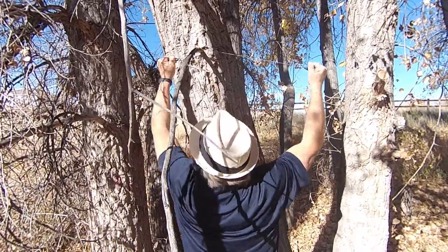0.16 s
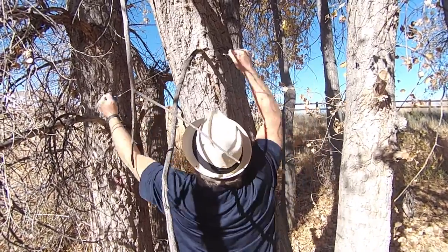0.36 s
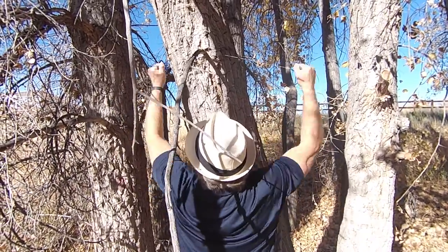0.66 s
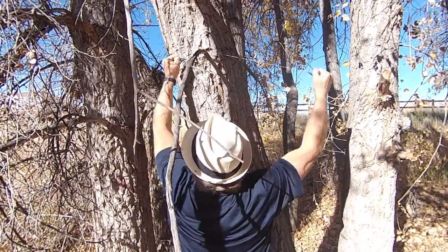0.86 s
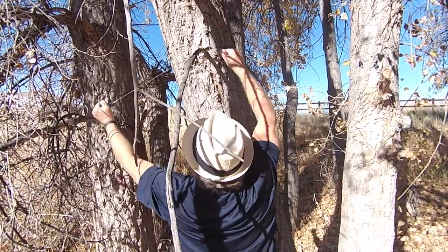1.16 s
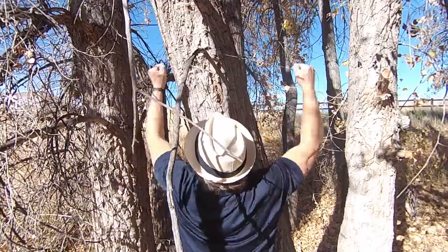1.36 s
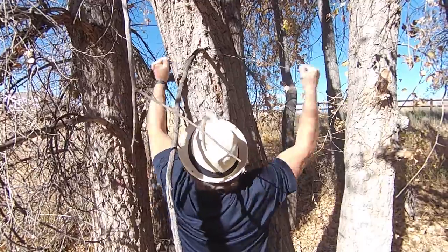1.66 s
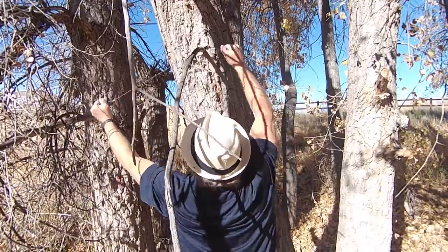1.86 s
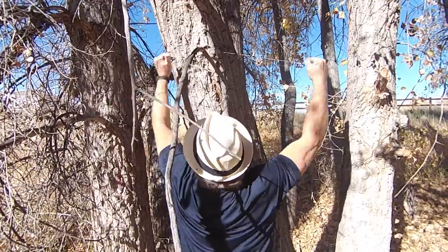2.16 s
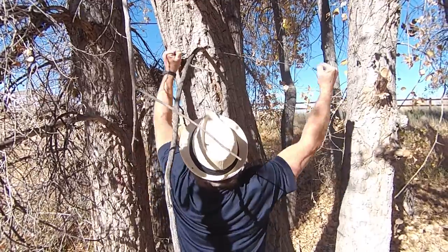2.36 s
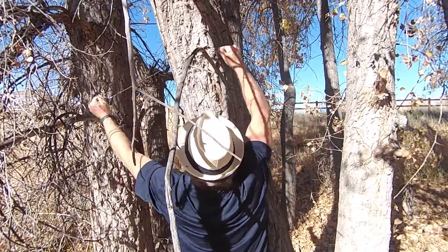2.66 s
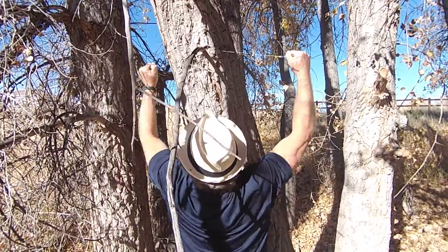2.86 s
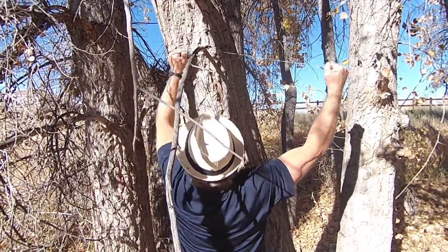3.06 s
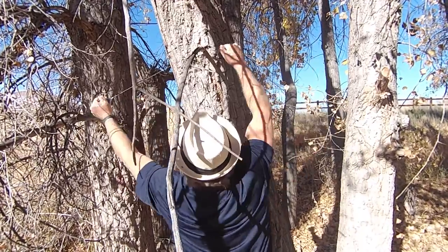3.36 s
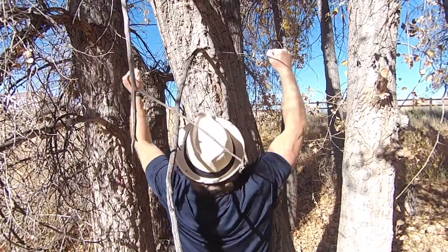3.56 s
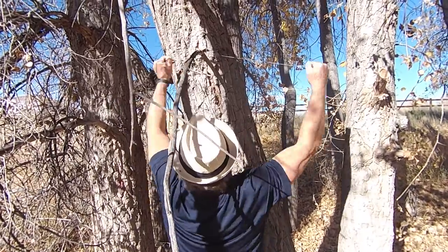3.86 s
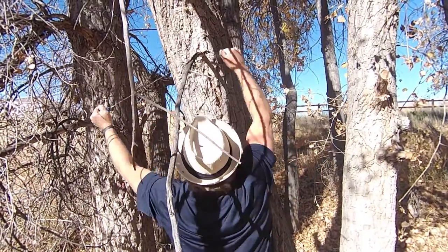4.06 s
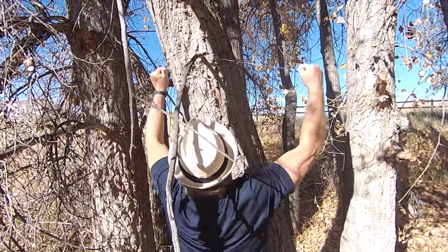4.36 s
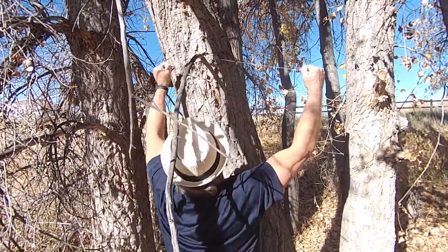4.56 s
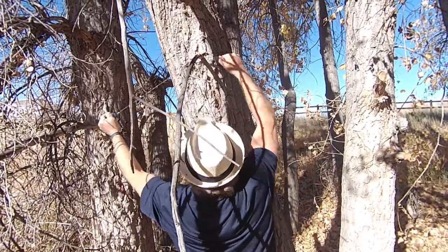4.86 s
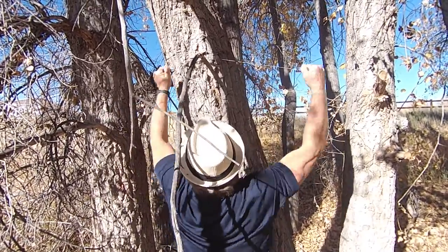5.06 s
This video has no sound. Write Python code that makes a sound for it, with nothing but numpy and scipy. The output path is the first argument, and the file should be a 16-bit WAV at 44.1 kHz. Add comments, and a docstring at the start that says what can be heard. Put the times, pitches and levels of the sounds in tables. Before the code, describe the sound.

A toothed cable saw is pulled by hand back and forth through a dry tree branch, about three strokes a second for the whole five seconds. The first pull only skims the bark, under a brief rustle of dry leaves. From about 0.1 seconds the teeth bite, and each stroke is a bright, gritty rasp that swells and falls away before the next. The teeth sing faintly through the rasp, and the cable and wood ring lightly, with brief high flares around 1.8, 3.5 and 4 seconds. Many pulls start with a tiny sharp catch. The strokes become slightly softer in the second half. Leaves rustle faintly again at about 4.7 seconds. Behind the sawing is a quiet outdoor hiss of air and distant leaves. Light wind puffs on the single microphone, with a few soft low thumps, clearest around 0.8 and 1.1 seconds.

```python
"""Cable saw in a dry branch

A toothed cable saw is pulled to and fro through a dry branch among trees. Its teeth tear the wood in
a stream of tiny blows that make the branch and cable ring, and their passing rate sings faintly through
the rasp. Leaves rustle at first and near the end; light wind puffs on the single microphone."""
import sys
import numpy as np
from scipy import signal
from scipy.fft import rfft, irfft, next_fast_len
from scipy.io import wavfile
from scipy.ndimage import uniform_filter1d, map_coordinates

SR = 44100
rng = np.random.default_rng(int(sys.argv[2]) if len(sys.argv) > 2 else 0)


def output_pcm(signal):
    """Save a mono or channel-first signal as 16-bit PCM at the path in sys.argv[1].

    Samples are clipped to [-1, 1] before scaling.
    """
    pcm = np.clip(np.atleast_2d(signal).T, -1, 1) * 32767
    wavfile.write(sys.argv[1], SR, np.round(pcm).astype(np.int16))


N = 229695

# Pulls of the saw; the first only skims the bark. Levels are relative. Each row has six groups:
# the start, bite, brightest, fastest, easing and end moments in seconds;
# rasp in dB at bite, brightest, fastest and easing; treble in dB at bite, brightest and easing;
# low scrape in dB at bite and mid-pull; tooth rate in Hz at brightest and fastest;
# tooth tone in dB at brightest and fastest.
SAW_PULLS = [
    [(-.2, -0.091, .05, 0.059, 0.094, 0.11), (-37, -39.5, -38, -42.5), (2, 2.5, 1), (0, 0), (2200, 2192),
     (-26, -28)],
    [(.06, .116, .19, .3, .352, .405), (-34.5, -34.5, -32, -33.5), (-10, -1, -7.5), (-7, -15.5),
     (2450, 3100), (-19, -1.7)],
    [(.415, .465, .54, .614, .692, .765), (-34.5, -32, -29.5, -33.5), (-17, -2, -7), (-5, -14.5),
     (2400, 2450), (-9, -11.5)],
    [(0.783, 0.831, .888, .98, 1.064, 1.13), (-37, -36, -31, -37), (-10, 0, -10.5), (-2.5, -21),
     (2300, 2900), (-13, -5.5)],
    [(1.12, 1.189, 1.288, 1.353, 1.42, 1.462), (-33.5, -31.5, -30, -35.5), (-13, -2, -7.5), (-8.5, -13.5),
     (2460, 2800), (-11, -21)],
    [(1.554, 1.575, 1.688, 1.776, 1.822, 1.868), (-34, -36, -31, -36), (-19, -2.8, -10), (-5, -18.5),
     (2480, 3100), (-25, -2)],
    [(1.88, 1.94, 2.1, 2.03, 2.182, 2.25), (-35.5, -33, -33, -36.5), (-19, -1.56, -7.5), (-10, -14.5),
     (2600, 2550), (-6.5, -8)],
    [(2.297, 2.343, 2.444, 2.535, 2.568, 2.625), (-36.5, -36, -33, -35.5), (-12, -3.5, -9.5), (-6.5, -19),
     (2550, 3200), (-11, -16)],
    [(2.633, 2.69, 2.84, 2.88, 2.938, 3.012), (-35.5, -33.7, -34, -36), (-22, -2.3, -10), (-6.5, -16),
     (2300, 2600), (-8, -19)],
    [(3.037, 3.082, 3.152, 3.29, 3.318, 3.372), (-34.5, -35.5, -34, -41.5), (-13, -1, -9), (-8, -16),
     (2000, 2750), (-23.5, -5)],
    [(3.363, 3.439, 3.54, 3.59, 3.67, 3.748), (-37.5, -36.5, -34.5, -41), (-10, 0, -5.5), (-4, -14.5),
     (2550, 2370), (-12, -11.5)],
    [(3.758, 3.79, 3.92, 3.965, 4.035, 4.11), (-36.5, -38.5, -36, -38), (-21, 0, -8), (-2.5, -10.5),
     (2470, 2720), (-10, -10.5)],
    [(4.111, 4.169, 4.31, 4.25, 4.362, 4.444), (-39, -34.5, -36, -37), (-7.5, -0.66, -5.5), (-1, -12),
     (2250, 2520), (-9, -8)],
    [(4.465, 4.516, 4.57, 4.67, 4.728, 4.8), (-40, -38, -35.5, -40.5), (-10, 0, -9.5), (-3.5, -15),
     (2150, 2440), (-13, -9.5)],
    [(4.795, 4.865, 4.92, 5.01, 5.092, 5.138), (-38, -36.5, -32.7, -39.5), (-6.5, -4, -6), (-1.8, -16.5),
     (2050, 2280), (-14, -9.5)],
    [(5.148, 5.179, 5.2, 5.24, 5.398, 5.45), (-48, -42.5, -37, -39), (-3, -6, -11), (-1, -11), (1900, 1730),
     (-5, -6)],
]
# Ringing notes of the branch and cable. Each row: pitch in Hz, width in Hz (widened if too narrow),
# then relative level in dB in the shallow, the middle and the deep cut.
RINGING_NOTES = [(543, 10, -20, -18.5, -15), (694, 14, -15, -15.5, -19), (796, 8.3, -12, -11.5, -13.5),
                 (953, 68, -10, -9, -17), (1035.4, 13, -9, -8, -9.5), (1207, 105, -10, -9.5, -9.5),
                 (1577, 11.7, -9.5, -4.5, -5), (1836, 20, -4.5, -10, 1), (2094, 127, -3.5, -4, -3),
                 (2106, 29, 0, -8, -27), (2405, 63, -5, -14.5, -9), (2596, 46, 4, 3.5, 7),
                 (2800, 160, -8, -5, -7), (3295, 13, 6, 7.5, 1), (3316, 92, 1, -3, -15),
                 (3910, 45, 10.5, 2, -10), (3933, 28, 9.5, 9, -5.5), (4160, 150, -25, -11, -12),
                 (4384, 33, -4, -3, -9.5), (4670, 180, -0.5, -2, 0.5), (4977, 51, -4.5, -5, -3),
                 (5302, 28, 4.5, -7.5, 2), (5323, 78, 1, -10, -3), (5974, 64, -1, -3.5, 0.5),
                 (6475, 55, -20, -2, -25.5), (6970, 18, -2.5, -9.5, -6.5), (7890, 44, -20, -26, -13),
                 (8690, 67, -2, -3, -4), (9900, 110, -26, -51, -33), (11470, 300, -11.5, -12, -9)]
# The cable skims bark, then settles into the wood. Each row: time in seconds, relative ringing in dB.
SEATING = [(0, -4), (.085, -17), (.11, -0.5)]
# Tone of tearing wood. Each row: frequency in Hz, relative level in dB.
RASP_SPECTRUM = [(240, -73), (400, -23), (751, -47), (903, -18), (1570, -9), (1720, -16.5), (2100, -7.5),
                 (2640, -5.5), (3710, -2.5), (4000, 2.5), (7510, -13), (9310, -5.5), (15700, -25.5)]
# Teeth catch as a pull starts. Each row: time in seconds, starting level in dB.
TOOTH_CATCHES = [(0.7764, -58), (0.8076, -39), (0.828, -36), (1.1812, -38), (1.5713, -35), (1.9006, -45),
                 (1.9315, -34), (2.3314, -39), (3.0584, -43), (3.0764, -40), (3.3922, -41), (3.7748, -42),
                 (4.146, -43)]
# The loudest flares of ringing. Each row: time in seconds, pitch in Hz, level in dB.
LOUD_FLARES = [(0.161, 2310, -40), (0.187, 4100, -44), (0.605, 3840, -43), (0.878, 2180, -40.5),
               (0.894, 3900, -39), (1.64, 2300, -41.5), (1.666, 3870, -46), (1.771, 3970, -34),
               (2.072, 6470, -42), (2.422, 6280, -46), (2.531, 3340, -40), (2.564, 2620, -42),
               (2.811, 2060, -44), (2.843, 3970, -43), (2.901, 2750, -47), (3.215, 2330, -42),
               (3.505, 4960, -37), (3.52, 2603, -36.5), (3.95, 4030, -37.5), (3.976, 2590, -44),
               (4.234, 4900, -41), (4.32, 2180, -42), (4.361, 2700, -39), (4.587, 4658, -43),
               (4.66, 2422, -39), (4.886, 6020, -46), (4.937, 4830, -42), (4.972, 6150, -42),
               (4.988, 2070, -40), (5.043, 2570, -39.5)]
# Dry leaves nearby. Each row: time of the peak in seconds, level in dB, seconds to fall by 15 dB.
LEAF_RUSTLES = [(.054, -43.5, 0.19), (.152, -53, 0.1), (4.712, -51, 0.2), (4.812, -64, .035)]
# Distant air and leaves. Each row: time in seconds, air level in dB, leaf hiss level in dB.
FAR_LEVELS = [(0.0, -54, -47), (0.42, -59, -66), (0.77, -61.5, -70), (1.15, -59, -70), (1.5, -61, -73),
              (1.85, -59.5, -73), (2.3, -60.5, -71), (2.62, -58.5, -71), (3.2, -57, -60), (3.75, -59, -63),
              (4.1, -58.5, -76), (4.46, -59.5, -74), (4.8, -59, -77), (5.21, -58, -74)]
# Tone of distant air, leaf hiss, leaf crackle and wind. Each row: frequency in Hz, relative level in dB.
AIR_SPECTRUM = [(120, -2), (200, -1), (600, 0), (2500, -2), (5000, -1), (6900, -6), (9500, -3),
                (12000, -11), (14000, -18), (15700, -20)]
HISS_SPECTRUM = [(5000, -30), (9000, 0), (12500, -3), (15700, -12)]
CRACKLE_SPECTRUM = [(150, -30), (350, -10), (800, 0), (4000, -3), (15000, -20)]
WIND_SPECTRUM = [(12, -30), (20, 0), (38, -1), (54, 3), (133, -11), (189, -17), (300, -40), (390, -45),
                 (660, -120)]
# Wind on the microphone. Each row: time in seconds, level in dB.
WIND_LEVELS = [(0.0, -69.5), (0.9, -65.5), (1.1, -65), (1.36, -69), (1.7, -68), (2.6, -65), (3.1, -69.5),
               (3.68, -63), (4.22, -68), (4.63, -67), (5.05, -66.5), (5.21, -75)]
# Soft thumps near the microphone. Each row: time in seconds, peak level in dB, pitch in Hz.
SOFT_THUMPS = [(0.072, -51, 79.4), (.553, -51, 510), (.791, -40.5, 73), (0.816, -40.5, 81),
               (0.838, -48, 89.5), (1.077, -43, 105.8), (2.44, -48, 87), (2.821, -50, 90),
               (3.085, -49, 89.7), (3.35, -54, 259.4), (4.755, -50, 70)]

CUT_STAGES_S = .8, 2.2, 4.2   # when the cut is shallow, middle and deep
MAX_Q = 110   # wood damps ringing: pitch divided by width is at most this
LOW_HZ, HIGH_HZ, TOP_HZ, CUTOFF_HZ = 1700, 7000, 11500, 15720
STILL_DB, SILENT_DB = -69, -85   # rasp at the ends of a pull, and between pulls
TREBLE_RISE_S, LOW_SETTLE_S = .034, .049   # counted from the bite
BITE_TOOTH_HZ, CATCH_DECAY_S, FLARE_SPREAD_S = 2005, .0035, .015


def saw():
    """Tiny tearing blows and the tooth tone make a broad rasp and set the branch and cable ringing."""
    rasp_db, treble_db, low_db, tooth_hz, tooth_db = pull_curves()
    blows = from_db(rasp_db + drift(33)) * grains(per_s=12000, spread_db=2.5)
    catches = tooth_catches()
    teeth = from_db(rasp_db + tooth_db) * tooth_tone(tooth_hz)
    wood = from_db(-5.5) * colour(blows, RASP_SPECTRUM) + from_db(-6.5) * teeth
    wood += cable_ringing(blows)
    wood += branch_ringing(blows + from_db(-5.5) * teeth)
    return pull_brightness(tension_sway(wood), treble_db, low_db) + catches


def pull_curves():
    """How the pulls move the rasp level, treble, low scrape, tooth rate and tooth level over time."""
    levels, treble, low, rate, teeth = [], [], [], [], []
    for moments, rasp_db, treble_db, low_db, tooth_hz, tooth_db in SAW_PULLS:
        start, bite, bright, fast, ease, end = moments
        # extra points about halfway up and down round off the edges
        rise = start + .51 * (bite - start)
        fall = ease + .48 * (end - ease)
        levels += in_time(sorted([
            (start - .004, SILENT_DB), (start, STILL_DB), (rise, rasp_db[0] - 12),
            *zip((bite, bright, fast, ease), rasp_db),
            (fall, rasp_db[-1] - 14.5), (end, STILL_DB), (end + .004, SILENT_DB)]))
        treble_in = min(bite + TREBLE_RISE_S, (bite + bright) / 2)
        treble += [*zip((bite, bright, ease), treble_db), (treble_in, treble_db[1] - 2.5), (fall, -9.5)]
        settled = min(bite + LOW_SETTLE_S, fast)
        low += [(bite, low_db[0]), (settled, low_db[1]), (fast, low_db[1]), (ease, -12)]
        rate += [(bite, BITE_TOOTH_HZ), *zip((bright, fast), tooth_hz), (ease, .9 * tooth_hz[1])]
        teeth += [(bite, -21), *zip((bright, fast), tooth_db), (ease, tooth_db[1] - 5)]
    return np.max(levels, axis=0), *(in_time(sorted(rows))[0] for rows in (treble, low, rate, teeth))


def tooth_tone(tooth_hz):
    """Teeth pass unevenly, so their tone is a narrow band of noise around their passing rate."""
    phase = 2 * np.pi * np.cumsum(tooth_hz) / SR
    uneven = keep_band(rng.standard_normal((2, N)), "low", hz=95, order=2)
    return rms_one(uneven[0] * np.sin(phase) + uneven[1] * np.cos(phase))


def tooth_catches():
    """Teeth catch as a pull starts, each time with a sharp burst of noise."""
    out, t = np.zeros(N), np.arange(1500) / SR
    fade = np.exp(-t / CATCH_DECAY_S)
    for s, level_db in TOOTH_CATCHES:
        at = round(s * SR)
        out[at:at + len(t)] += from_db(level_db) * rng.standard_normal(len(t)) * fade
    return colour(out, RASP_SPECTRUM)


def cable_ringing(blows):
    """The cable's many faint, high notes come and go as different links touch."""
    out = np.zeros(N)
    for hz in np.geomspace(7400, 14500, 14):
        level_db = -11 - 32 * np.log2(hz / 9000) ** 2 + 3.6 * drift(26)
        out += resonate(from_db(level_db) * blows, hz, width_hz=71)
    return out


def branch_ringing(push):
    """The branch and cable ring together; the mix of notes changes as the cut deepens."""
    out, t = np.zeros(N), np.arange(N) / SR
    seating_db, = in_time(SEATING)
    for k, (hz, width_hz, *stages_db) in enumerate(RINGING_NOTES):
        wander_db = 1.5 * drift(16)   # the contact point wanders
        grip = from_db(np.interp(t, CUT_STAGES_S, stages_db) + seating_db + 8 + wander_db)
        out += (-1) ** k * resonate(grip * push, hz, max(width_hz, hz / MAX_Q))
    return out


def tension_sway(wood):
    """Changing tension bends every pitch a little."""
    shift = np.cumsum(.0022 * drift(30))
    shift -= uniform_filter1d(shift, size=4000)   # keeps the pulls on time
    return map_coordinates(wood, [np.arange(N) + shift], order=3)


def pull_brightness(wood, treble_db, low_db):
    """Each pull brightens toward its middle; its low scrape is strongest at the bite."""
    low = keep_band(wood, "low", LOW_HZ, order=4)
    above_low = keep_band(wood, "high", LOW_HZ, order=4)
    middle = keep_band(above_low, "low", HIGH_HZ, order=2)
    high = keep_band(wood, "high", HIGH_HZ, order=2)
    top = keep_band(high, "high", TOP_HZ, order=1)
    treble_db = np.clip(treble_db, -16, 2)
    high = high - top + from_db(.3 * treble_db + .7) * top   # the very top swings further
    scrape = from_db(low_db + 10.5 + 3 * drift(14.3)) * low
    return scrape + middle - from_db(treble_db + 6.5) * high


def flares():
    """One note swells and fades quickly as a run of teeth catches it; fainter ones come at random."""
    out, span = np.zeros(N + SR), np.arange(-2600, 2600)
    swell = np.exp(-.5 * (span / SR / FLARE_SPREAD_S) ** 2)
    rasp_db = pull_curves()[0]
    pitches = [hz for hz, *_ in RINGING_NOTES if 1900 < hz < 7500]
    faint = []
    for when, pick in rng.random((30, 2)):
        s = .1 + 5.1 * when
        faint.append((s, pitches[int(pick * len(pitches))], rasp_db[int(s * SR)] - 12.5))
    for s, hz, level_db in LOUD_FLARES + faint:
        ringing = resonate(rng.standard_normal(N // 20), hz, width_hz=150)[-len(span):]
        out[round(s * SR) + span] += from_db(level_db) * rms_one(ringing) * swell
    return out[:N]


def leaves_and_air():
    """Dry leaves crackle briefly nearby, over the hiss of distant leaves and air."""
    t = np.arange(N) / SR
    rustle_db = np.max([db - 15 * abs(t - s) / fall_s for s, db, fall_s in LEAF_RUSTLES], axis=0)
    air_db, hiss_db = in_time(FAR_LEVELS)
    hiss = colour(grains(per_s=9000, spread_db=2.5), HISS_SPECTRUM)
    crackle = colour(grains(per_s=6000, spread_db=4), CRACKLE_SPECTRUM)
    air = colour(rng.standard_normal(N), AIR_SPECTRUM) * from_db(drift(3))
    return from_db(rustle_db) * crackle + from_db(air_db) * air + from_db(hiss_db) * hiss


def thumps():
    """Each soft thump is one push with a rebound on either side; higher ones ring a few cycles."""
    out, span = np.zeros(N), np.arange(-1500, 1500)
    t = span / SR
    swell = np.exp(-.5 * (t / .004) ** 2)
    for s, peak_db, hz in SOFT_THUMPS:
        out[round(s * SR) + span] += from_db(peak_db) * swell * np.cos(2 * np.pi * hz * t)
    return out


def wind():
    """Gusts on the microphone make a low, lumpy rumble."""
    wind_db, = in_time(WIND_LEVELS)
    return from_db(wind_db + 2.5 * drift(15)) * colour(rng.standard_normal(N), WIND_SPECTRUM)


def from_db(db):
    """Turn decibels into a number to multiply by."""
    return 10 ** (np.asarray(db) / 20)


def rms_one(x):
    """Scale a signal so its average strength (rms) is 1."""
    return x / np.sqrt(np.mean(x ** 2) + 1e-20)


def in_time(rows):
    """Join rows of (seconds, values) with straight lines, one curve for each value column."""
    s, *columns = np.transpose(rows)
    return [np.interp(np.arange(N) / SR, s, column) for column in columns]


def keep_band(x, side, hz, order):
    """Keep the "low" or "high" side of a frequency; a greater order cuts more steeply."""
    return signal.sosfilt(signal.butter(order, hz, side, fs=SR, output="sos"), x)


def colour(x, spectrum):
    """Shape the tone with (Hz, dB) points; white noise keeps its strength."""
    size = next_fast_len(N + 4096)
    hz = np.arange(1, size // 2 + 2) * SR / size
    points_hz, points_db = np.transpose(spectrum)
    gain = rms_one(from_db(np.interp(np.log(hz), np.log(points_hz), points_db)))
    return irfft(rfft(x, size) * gain, size)[:N]


def drift(rate_hz):
    """A smooth random wobble of typical size 1."""
    step, warm_up = 40, 2000
    r = np.exp(-2 * np.pi * rate_hz * step / SR)
    noise = rng.standard_normal(N // step + warm_up + 2)
    slow = signal.lfilter([1], [1, -2 * r, r * r], noise)[warm_up:]
    return np.interp(np.arange(N) / step, np.arange(len(slow)), rms_one(slow))


def resonate(x, hz, width_hz):
    """Ring at one pitch; a narrower width rings longer."""
    r = np.exp(-np.pi * width_hz / SR)
    gain = (1 - r * r) / 2
    return signal.lfilter([gain, 0, -gain], [1, -2 * r * np.cos(2 * np.pi * hz / SR), r * r], x)


def grains(per_s, spread_db):
    """Random clicks of uneven size, with an overall strength of 1."""
    sizes = from_db(spread_db * np.minimum(rng.exponential(1, N), 4))
    signs = rng.choice([-1, 1], N)
    return rms_one(sizes * signs * (rng.random(N) < per_s / SR))


def scene():
    """All sources reach one microphone, so both channels are the same."""
    return np.tile(saw() + flares() + leaves_and_air() + wind() + thumps(), (2, 1))


def record(dry):
    """Cut off the very highest treble steeply."""
    return signal.sosfilt(signal.ellip(14, .3, 75, CUTOFF_HZ, fs=SR, output="sos"), dry)


dry = scene()
out = record(dry)
output_pcm(out)
```